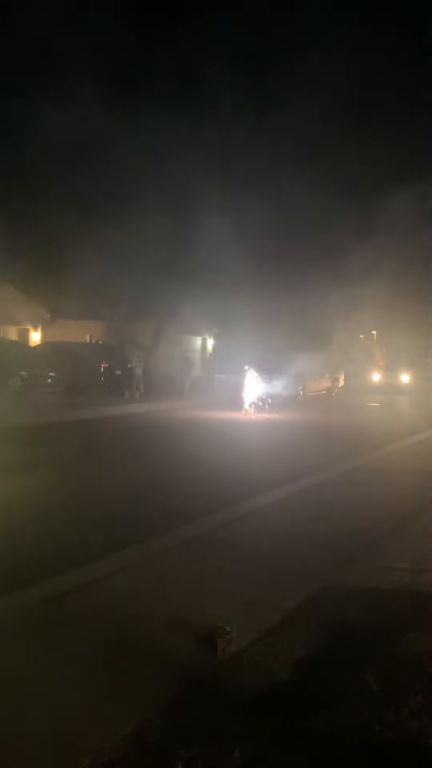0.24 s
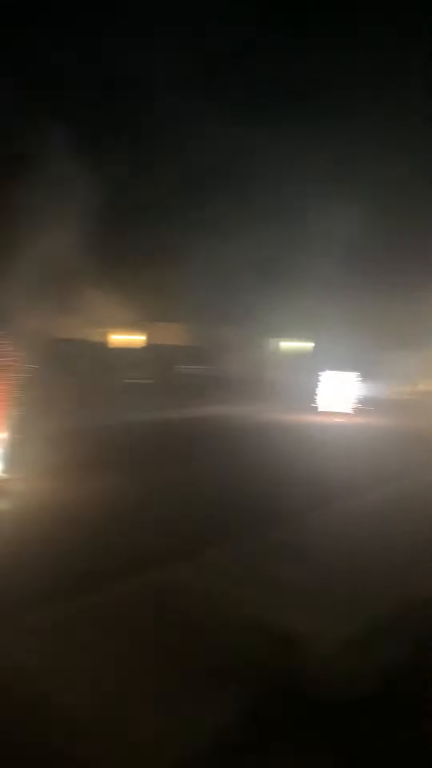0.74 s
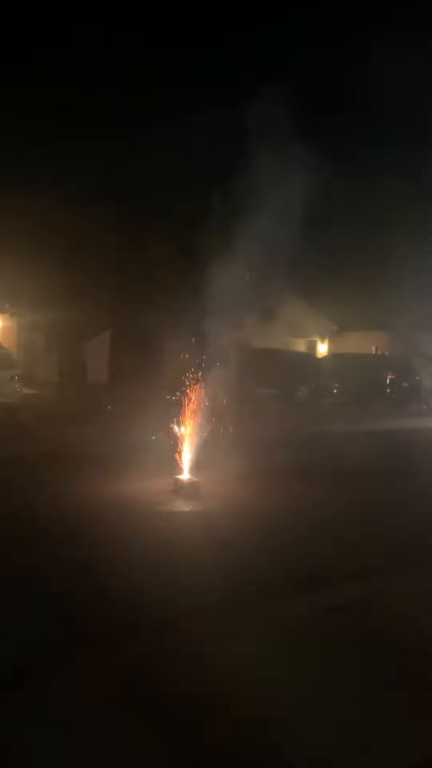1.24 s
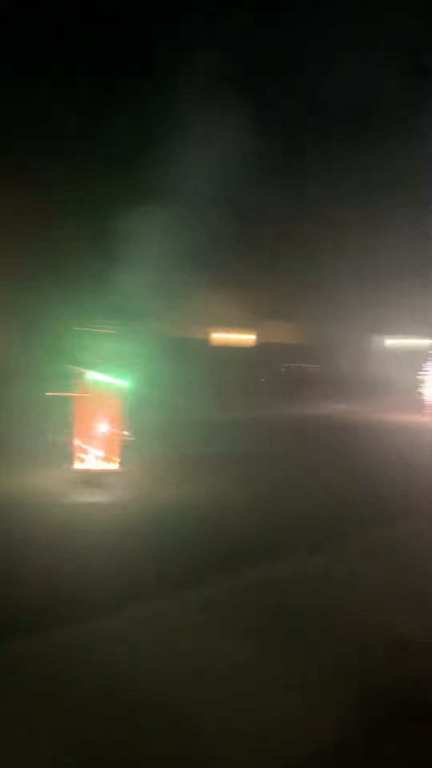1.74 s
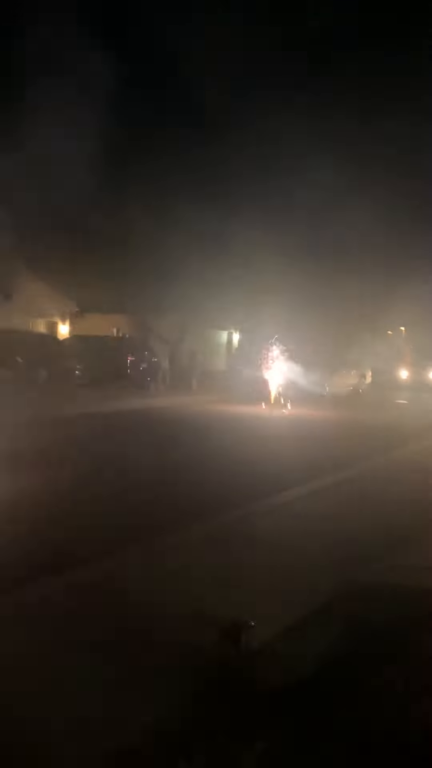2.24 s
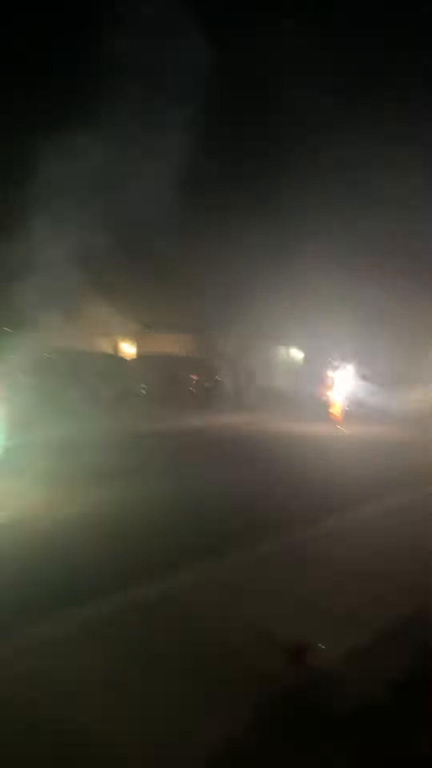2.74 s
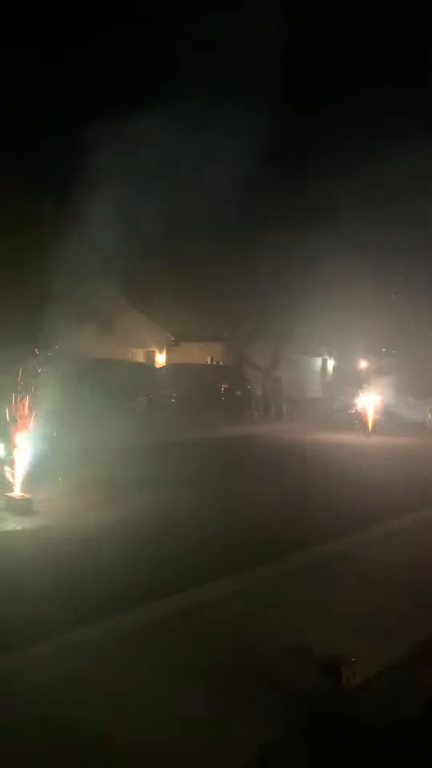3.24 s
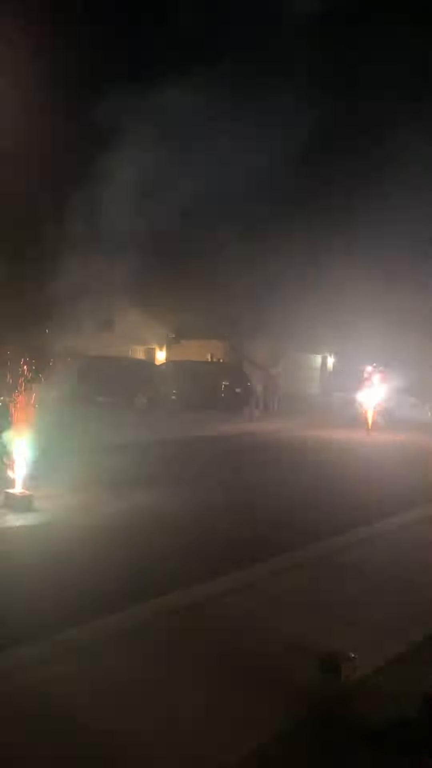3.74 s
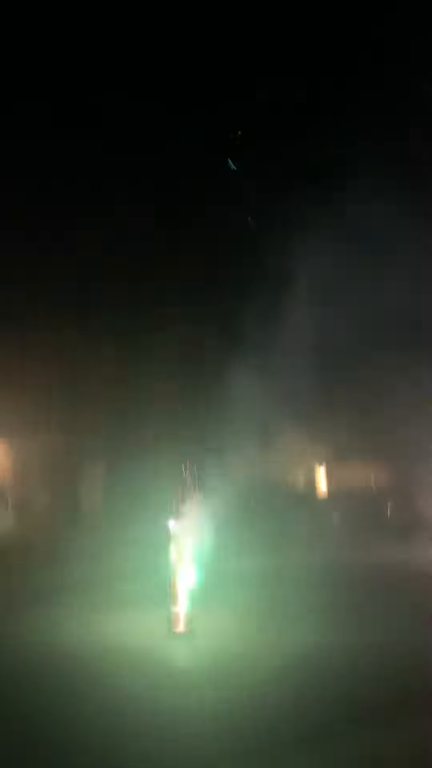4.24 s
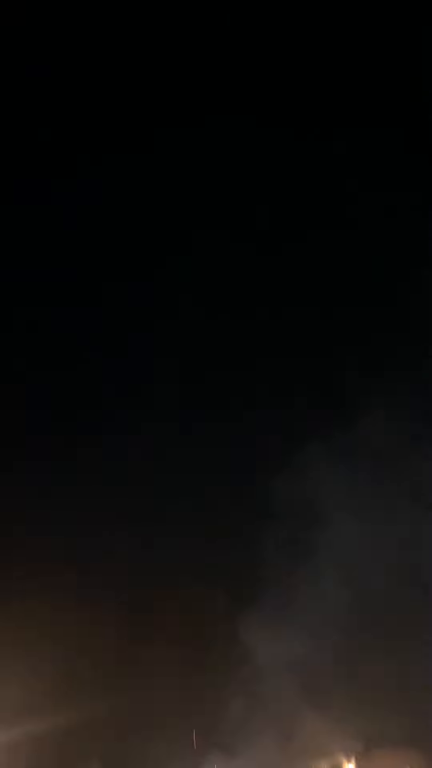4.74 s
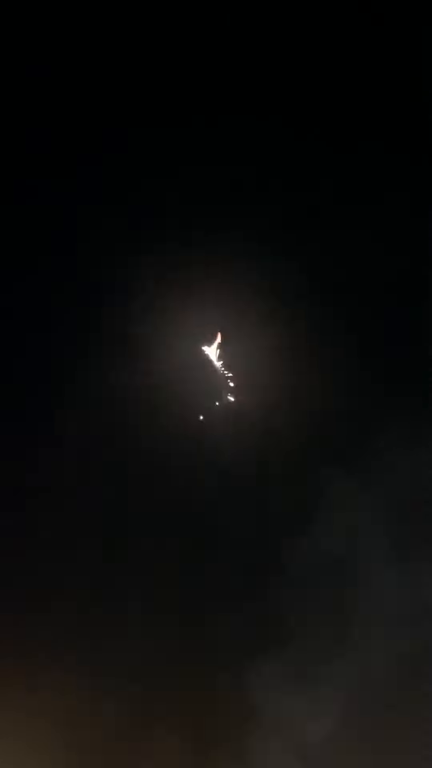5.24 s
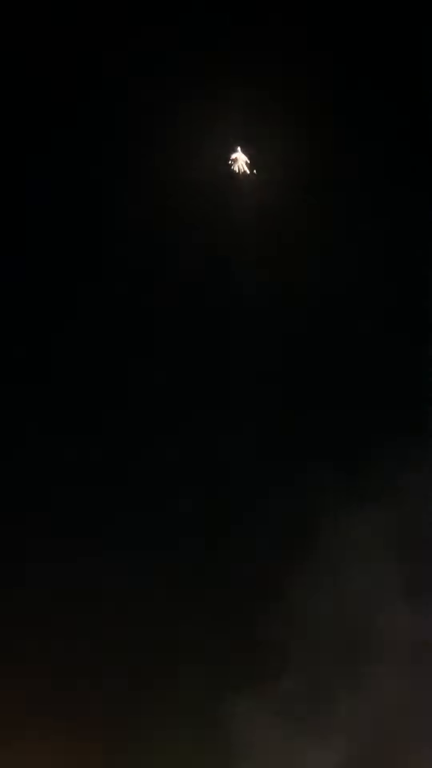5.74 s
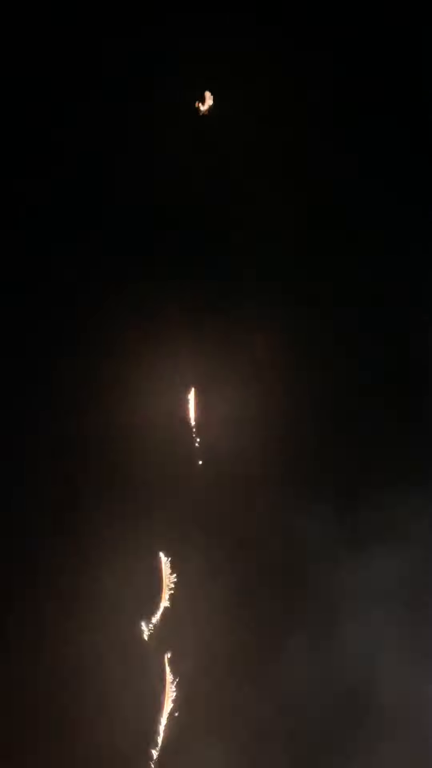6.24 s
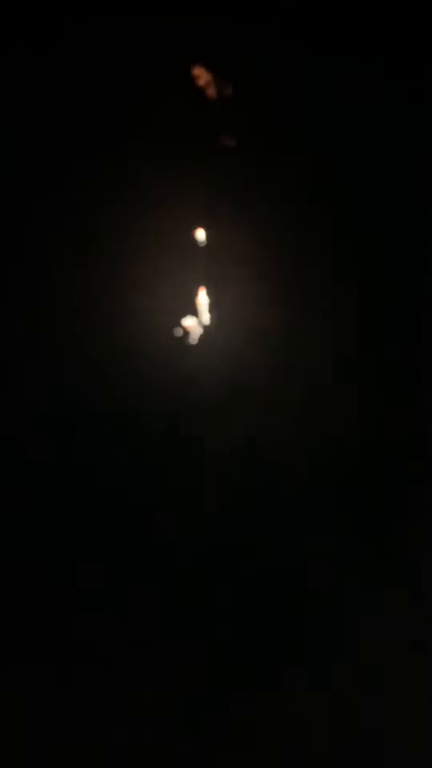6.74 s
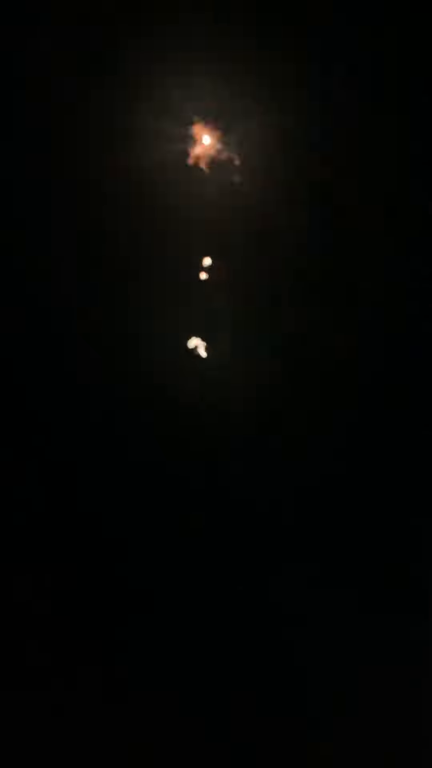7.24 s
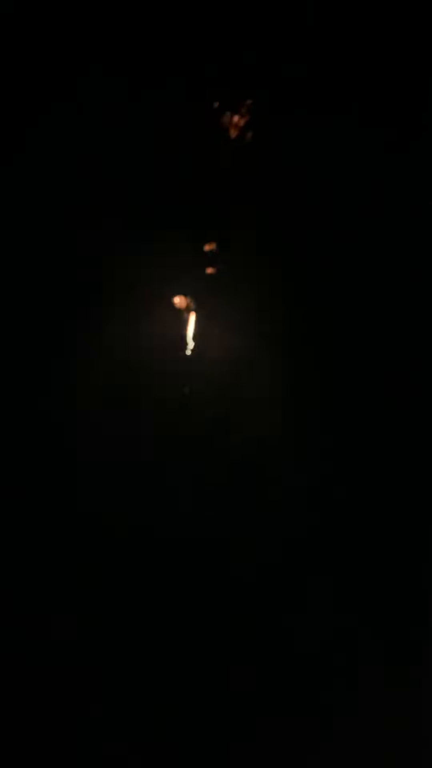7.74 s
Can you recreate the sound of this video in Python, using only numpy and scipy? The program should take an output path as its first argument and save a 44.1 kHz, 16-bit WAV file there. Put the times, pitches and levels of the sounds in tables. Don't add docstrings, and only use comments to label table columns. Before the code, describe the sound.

A firework fountain catches, bursts into dense sharp crackling on a night street, then sputters while tubes thump out shrill whistling stars that sink in pitch.

```python
import sys
import numpy as np
from scipy import signal
from scipy.fft import rfft, irfft, next_fast_len
from scipy.io import wavfile
from scipy.ndimage import uniform_filter1d, minimum_filter1d

SR = 44100
rng = np.random.default_rng(int(sys.argv[2]) if len(sys.argv) > 2 else 0)


def transcribe(signal):
    frames = np.atleast_2d(signal).T
    limited = np.clip(frames, -1, 1)
    pcm = np.round(limited * 32767).astype(np.int16)
    wavfile.write(sys.argv[1], SR, pcm)


def magnitude_from_level(level_db):
    exponent = np.asarray(level_db, float) / 20
    return 10 ** exponent


N = 352359

# (time [s], jet hiss [dB], crackle [dB])
BURN = [(0, -55.5, -48), (1.2, -54, -39), (1.68, -44.5, -62), (1.8, -27, -9.5), (2.679, -29.5, -9),
        (2.75, -36, -8), (3.5, -33.5, -9.5), (3.7, -49, -17.5), (4.1, -39.5, -18), (5.8, -39, -14),
        (6.3, -41.5, -25), (6.55, -50.5, -66), (7.99, -53.5, -97)]
# (time [s], peak [dB])
LOUD_SPARKS = [(1.248, -10), (1.3047, -23), (1.3393, -14.5), (1.35, -7), (1.3771, -9.5), (1.405, -22),
               (1.4315, -23.5), (1.458, -23.5), (1.4944, -23), (1.5189, -8), (1.5745, -23.5), (1.6096, -3.5),
               (1.6654, -19.5), (1.7015, -14), (1.706, -7.5), (1.7277, -7), (1.7323, -4.5), (1.741, -11),
               (1.7633, -5.5), (1.7872, -4), (1.8152, -9), (1.8348, -4.5), (1.8526, -3), (1.8714, -7),
               (1.8916, -2.5), (1.9106, -7.5), (1.9193, -0.5), (1.9345, -4), (1.9433, -5.5),
               (1.9782, -4), (1.9957, -0.5), (2.021, -1), (2.0434, -2), (2.0756, -2), (2.0935, -7.5),
           (2.109, -3.5), (2.1361, -3.5), (2.17, -7.5), (2.1858, -4), (2.2002, -3.5), (2.2701, -2.5),
           (2.2861, -0.5), (2.3029, -6), (2.3272, -0.5), (2.3584, -4.5), (2.3921, -7.5), (2.4365, -7),
           (2.4525, -3.5), (2.4974, -1), (2.5083, -5), (2.5289, -5), (2.5585, -6), (2.5766, -3.5),
           (2.5952, -5), (2.6247, -2), (2.6546, -1), (2.668, -4), (2.6708, -7), (2.6751, -3.5),
               (2.7412, -11.5), (2.782, -10), (2.8244, -11), (2.864, -8), (2.904, -6), (2.9395, -7),
           (2.9429, -3.5), (2.979, -14.5), (2.9902, -4.5), (3.0272, -3), (3.0477, -6), (3.066, -4),
           (3.092, -9.5), (3.1463, -8.5), (3.1712, -3.5), (3.245, -3), (3.2624, -6), (3.303, -23.5),
           (3.3429, -7.5), (3.4001, -9), (3.4225, -5.5), (3.4502, -5), (3.5226, -7.5), (3.5426, -3),
           (3.6062, -12.5), (3.6527, -18), (3.9644, -17.5), (4.0066, -17), (4.0547, -15.5), (4.0952, -19.5),
               (4.1785, -8.5), (4.248, -8), (4.3195, -10.5), (4.3556, -5.5), (4.4066, -10), (4.5042, -7),
              (4.5694, -10.5), (4.6842, -13.5), (4.735, -17.5), (4.7981, -8.5), (4.8275, -7), (4.846, -5.5),
              (4.8778, -4.5), (4.9509, -8), (5.2694, -9.5), (5.3074, -11), (5.4072, -7), (5.4615, -10.5),
              (5.5814, -11), (5.647, -18.5), (5.717, -10.5), (5.786, -11), (5.846, -5), (6.0117, -9.5),
              (6.0655, -10), (6.455, -20.5), (7.126, -13), (7.2637, -22), (7.3603, -23.5), (7.6541, -16)]
HUSH_S = .014, 0.0033
# (frequency [Hz], level [dB])
SPARK = [(300, -41.5), (1000, -43), (2500, -1), (5000, 2.5), (7500, 0), (11000, -4), (16000, -13)]
# (frequency [Hz], level [dB], t60 [s])
CASING = [(311, -29.5, 0.055), (865, -13, 0.0026), (1607, -15, 0.0093), (2290, -10.5, 0.0018)]
# (frequency [Hz], level [dB])
CRACKLE_COLOUR = [(60, -18.5), (220, -9), (400, -6), (600, -10), (800, 0.5)]
# (frequency [Hz], change [dB])
TIPPED = [(500, -1), (1000, 3.5), (1700, -5), (2600, -7.5), (5000, -2)]
TIP_S = 3.7, 4.78

# (launch [s], first [Hz], last [Hz], sink [s])
STARS = [(3.555, 4872, 3019, .53), (4.893, 5133, 3202, .623), (5.862, 4952, 2808, .736),
         (6.02, 4960, 3236, .636), (6.075, 5510, 2896, .595), (7.137, 4855, 3276, .379)]
# (launch [dB], fade [dB/s], ground-image dip age [s], dip [dB], dip width [s])
FADES = [(-18, -11.5, .68, -10.5, 0.17), (-19.5, -12.5, 0.94, -2.5, 0.17), (-17.5, -23, .6, -5, 0.074),
         (-21.5, -9, 0.677, -7, 0.23), (-24, -11, 0.94, 0.5, 0.084), (-20.5, -13.5, .4, -7, 0.028)]
# (yelp [share of pitch], wane age [s], wane [dB])
HOOKS = [(0.0287, 1.1, -5.5), (.06, 1.3, -4), (0.009, 1.3, 1), (.005, 1.13, -11), (0.029, 0.965, -11.5),
         (0.0045, 0.69, -11.5)]
# (burn [s], turn age [s], rise [Hz])
ENDS = [(1.73, 1.47, 150), (1.57, 1.5, 230), (1.63, 1.56, 130), (1.63, 1.55, 230), (1.45, 1.36, 90),
        (1.6, 1.5, 100)]
# (2nd, 3rd, 4th partial at launch [dB], spin [1/s], spin depth [0-1])
VOICES = [(-13, -15.5, -24, 9.5, 0.54), (-12.5, -9.5, -16, 17, 0.4), (-12, -16.5, -24, 13, 0.64),
          (-13, -14.5, -28, 8.9, 0.07), (-15, -14, -22, 14, 0.68), (-15.5, -21, -35, 13, 0.1)]
OVERTONES_DB_PER_S = [2, -5, 2]

# (time [s], peak [dB], ring [Hz], crack
# [dB], boom [dB])
SHOTS = [(0.287, -37, 207, -17, 1), (0.356, -32.5, 368, -23, -1), (2.133, -11.5, 298, -4, -4),
         (3.543, -14, 255, 18, -16), (4.877, -13.5, 313, -21, -14), (5.845, -11, 310, -7, -14),
         (6.009, -13, 335, -9, -11), (6.066, -18, 340, -19, -15), (7.124, -15.5, 364, -27, -16.5),
         (7.195, -28.5, 300, -28, -20), (7.654, -31.5, 343.6, -29.5, -8)]

# (frequency [Hz], level [dB])
JET = [(200, 7.5), (430, 3.5), (600, 0), (1550, 5), (2100, 7.5), (3100, 3), (3800, 7), (4500, 15.5),
       (5500, 2), (7000, 5.5), (9000, -9), (15000, -5)]
# (frequency [Hz], level [dB])
RUMBLE = [(40, -1), (90, -0.5), (300, -1.5), (600, -11), (900, -9.5), (2200, -22), (3000, -10),
          (9000, -25.5)]
RUMBLE_S = 2.8, 3.8, 6.3, 6.6
RUMBLE_DB = -48.5, -57.5, -55.5, -50
# (frequency [Hz], change [dB])
SKYWARD = [(60, -6), (150, -9), (900, -9), (1500, 1.5), (3000, 1), (7000, 0), (10000, -5.5)]
# (start [s], end [s], pitch [Hz], level [dB])
DRONE = [(5.303, 5.814, 69.4, -53), (5.954, 6.41, 71, -52), (6.6, 7.112, 70.7, -58),
         (7.396, 8.209, 61.6, -62)]

# (frequency [Hz], t60 [s])
STREET = [(100, 0.057), (400, 0.57), (1500, 0.15), (4000, 0.27), (9000, 0.033), (16000, 0.36)]
# (delay [ms], level [dB])
WALLS = [(12, -19), (21, -12), (38, -68), (57, -17.5), (70, -14), (95, -18), (135, -20.5)]

# (frequency [Hz], likeness [0-1])
SAME = [(400, .99), (700, .6), (950, .9), (1400, .7), (2800, .3), (3500, .8), (4000, .82), (4500, .96),
        (9000, .94)]
# (frequency [Hz], lead [rad])
TURN = [(40, 0), (170, .3), (350, 1), (600, 1.9), (750, 1.2), (1050, 1.7), (1500, .2), (2600, .3),
        (3300, -.6), (3700, -1.8)]
# (frequency [Hz], difference [dB])
LEAN = [(50, 2.2), (200, 4.5), (400, 1), (700, -2), (1500, -2), (3000, -1.5), (4000, -1)]


def sparks(per_s=105, clumpy=0.56, spread_db=-6, bounce_ms=0.78, scatter_ms=.22, skew_ms=.25,
           fizz_s=0.024, fizz_db=-25, bounce_gain=.85):
    small = rng.random((1600, 3))
    at = (small[:, 0] * N).astype(int)
    loud_s, loud_db = np.transpose(LOUD_SPARKS)
    clump = np.clip(1 + clumpy * wander(N, 14), 0, 2.5)[at]
    ahead_s = loud_s - at[:, None] / SR
    hushed = ((ahead_s < HUSH_S[0]) & (ahead_s > -HUSH_S[1])).any(axis=1)
    lit = (small[:, 2] < clump * per_s * N / SR / len(small)) & ~hushed
    spread = magnitude_from_level(spread_db * np.minimum(-np.log(small[:, 1] + 1e-9), 4))
    size = np.r_[magnitude_from_level(loud_db), lit * burn(2)[at] * spread]
    at = np.r_[np.round(loud_s * SR), at]

    height, side = rng.standard_normal((len(at), 2)).T
    echo = abs(bounce_ms + scatter_ms * height) * SR / 1000
    train = np.zeros((2, N))
    for port, shift in enumerate((0, skew_ms * SR / 1000 * side)):
        direct = np.clip(at + shift, 0, N - 1).astype(int)
        bounced = np.clip(at + shift + echo, 0, N - 1).astype(int)
        np.add.at(train[port], direct, size)
        np.add.at(train[port], bounced, bounce_gain * size)

    glow = signal.lfilter([1], [1, -np.exp(-np.log(1000) / (fizz_s * SR))], train, axis=1)
    drive = train + magnitude_from_level(fizz_db) * glow * rng.standard_normal((2, N))
    t = np.arange(1024) / SR
    shock = causal(SPARK)
    shock = shock / abs(shock).max()
    for hz, db, t60 in CASING:
        shock = shock + magnitude_from_level(db - 60 * t / t60) * np.sin(2 * np.pi * hz * t)
    return -1.2 * signal.oaconvolve(drive, shock[None], axes=1)[:, :N]


def star(row, fade, hook, end, voice, wobble=0.0181, settle_s=0.28, steady_sway=0.00098, jitter=0.0098,
         flutter_db=3, twin=0.038, twin_db=-6, roar_db=-42, drift_rad=2.37, spent_s=.04):
    *overs_db, spin_hz, depth = voice
    launch_s, burn_s = row[0], end[0]
    t = np.arange(launch_s, min(launch_s + burn_s, N / SR), 1 / SR)
    age = t - launch_s
    hz, db = flight(age, *row[1:], fade, hook, end)
    fresh = np.exp(-age / settle_s)
    spin = 2 * np.pi * (spin_hz * age + rng.random())
    sway = steady_sway + wobble * (0.25 + depth) * fresh
    sway = sway * (np.sin(spin) + 0.562 * wander(len(t), 25.8))
    pitch = hz * (1 + sway + jitter * fresh * wander(len(t), 150))
    facing = 1 - np.clip(depth, 0, .98) * (.5 + .5 * np.cos(spin))
    ports = np.array([0 * t, drift_rad * wander(len(t), 5.17)])

    tone = magnitude_from_level(roar_db) * rng.standard_normal((2, len(t)))
    for shift, gain in ((1, 1), (1 + twin * fresh, magnitude_from_level(twin_db) * fresh)):
        turn = 2 * np.pi * np.cumsum(pitch * shift) / SR + ports
        tone += gain * np.cos(turn)
        for k, over_db, db_per_s in zip(range(2, 5), overs_db, OVERTONES_DB_PER_S):
            level = magnitude_from_level(over_db + db_per_s * age) * facing ** (k - 1) * (k * pitch < SR / 2.5)
            tone += gain * level * np.cos(k * turn)

    edges = np.clip(np.minimum(age / 0.002, (burn_s - age) / spent_s), 0, 1)
    flutter = magnitude_from_level(db + flutter_db * wander(len(t), 43.6))
    out = np.zeros((2, N))
    out[:, round((launch_s - .003) * SR):][:, :len(t)] = np.sqrt(2) * tone * edges * flutter
    return out


def flight(age, first_hz, last_hz, sink_s, fade, hook, end, hook_s=.035, wane_s=.03, chirp_s=.015,
           burst_db=3, burst_s=0.022):
    launch_db, fade_db, dip_age, dip_db, dip_s = fade
    yelp, wane_age, wane_db = hook
    _, turn_age, rise_hz = end
    hz = last_hz + (first_hz - last_hz) * np.exp(-age / sink_s)
    hz = hz + rise_hz / (1 + np.exp((turn_age - age) / hook_s))
    hz = hz * (1 + yelp * np.exp(-age / chirp_s))
    db = launch_db + fade_db * age
    db = db + dip_db * np.exp(-((age - dip_age) / dip_s) ** 2)
    db = db + wane_db / (1 + np.exp((wane_age - age) / wane_s))
    return hz, db + burst_db * np.exp(-age / burst_s)


def shots(peak_s=0.006, width_s=0.0018, heave_rad=1.2, fuse_s=0.00077, crack_t60=0.0069,
          knock_hz=680, knock_db=-12, knock_s=0.0038, boom_hz=100, boom_s=0.00695, boom_t60=0.067):
    t = np.arange(6000) / SR
    out = np.zeros(N + 6000)
    knock = np.sin(2 * np.pi * knock_hz * t) * np.exp(-((t - knock_s) / width_s) ** 2)
    after = np.maximum(t - boom_s, 0)
    for s, db, hz, crack_db, boom_db in SHOTS:
        heave = np.cos(2 * np.pi * hz * (t - peak_s) + heave_rad)
        heave = heave * np.exp(-((t - peak_s) / width_s) ** 2)
        boom = magnitude_from_level(boom_db - 60 * after / boom_t60) * np.sin(2 * np.pi * boom_hz * after)
        crack = magnitude_from_level(min(crack_db, -3) - 60 * (t - fuse_s) / crack_t60) * (t > fuse_s)
        crack = crack * rng.standard_normal(len(t))
        thump = 1.2 * heave + magnitude_from_level(knock_db) * knock + boom + crack
        out[round(s * SR):][:len(t)] += magnitude_from_level(db) * thump
    return out[:N]


def hiss_and_rumble():
    t = np.arange(N) / SR
    hiss = burn(1) * noise(JET, patchy_db=4.7)
    rumble = magnitude_from_level(np.interp(t, RUMBLE_S, RUMBLE_DB)) * noise(RUMBLE, patchy_db=2.5)
    return crossfaded(hiss + rumble, SKYWARD, RUMBLE_S[2:])


def drone():
    t = np.arange(N) / SR
    out = np.zeros(N)
    for start, end, hz, db in DRONE:
        swell = np.sin(np.pi * np.clip((t - start) / (end - start), 0, 1))
        out += np.sqrt(2) * magnitude_from_level(db) * swell * np.sin(2 * np.pi * hz * t)
    return out


def street(x, wet_db, walls_db):
    taps = np.zeros((2, SR // 2))
    at = np.arange(480, SR // 2 - 20, 20)
    at = at + rng.integers(0, 20, (2, len(at)))
    np.put_along_axis(taps, at, rng.choice([-1., 1.], at.shape), 1)
    hz, t, z = signal.stft(taps, SR, nperseg=256)
    tail = signal.istft(z * magnitude_from_level(-60 * t / read(STREET, hz)[:, None]), SR, nperseg=256)[1]
    tail *= magnitude_from_level(wet_db) / np.linalg.norm(tail[0])
    for ms, db in WALLS:
        tail[:, round(ms * SR / 1000)] += magnitude_from_level(db + walls_db)
    return x + signal.fftconvolve(x * np.ones((2, 1)), tail, axes=1)[:, :N]


def burn(column):
    rows = np.transpose(BURN)
    return magnitude_from_level(np.interp(np.arange(N) / SR, rows[0], rows[column]))


def noise(points, patchy_db):
    hz = np.fft.rfftfreq(1024, 1 / SR)
    a, b, patches = rng.standard_normal((N // 256 + 5, 513, 2, 3)).T
    patches = uniform_filter1d(patches[0], size=12, axis=0)
    patches = evened(uniform_filter1d(patches, size=12, axis=1))
    z = (a + 1j * b) * magnitude_from_level(read(points, hz)[:, None] + patchy_db * patches)
    return evened(signal.istft(z, nperseg=1024, noverlap=768)[1][:, :N])


def wander(size, hz):
    return evened(signal.lfilter(*signal.butter(2, hz, fs=SR), rng.standard_normal(size)))


def evened(x):
    return x / np.sqrt(np.mean(x ** 2) + 1e-20)


def read(points, hz):
    f, value = np.transpose(points)
    return np.interp(np.log(hz + 1), np.log(f + 1), value)


def causal(points):
    log_gain = np.log(magnitude_from_level(read(points, abs(np.fft.fftfreq(2048, 1 / SR)))))
    return np.fft.ifft(np.exp(np.conj(signal.hilbert(log_gain)))).real[:1024]


def filtered(x, points):
    return signal.oaconvolve(x, causal(points)[None], axes=1)[:, :N]


def crossfaded(x, points, span_s):
    turned = np.interp(np.arange(N) / SR, span_s, (0, 1))
    return (1 - turned) * x + turned * filtered(x, points)


def scene():
    crackle = filtered(street(sparks(), wet_db=-9.5, walls_db=-5), CRACKLE_COLOUR)
    crackle = crossfaded(crackle, TIPPED, TIP_S)
    whistles = sum(star(*rows) for rows in zip(STARS, FADES, HOOKS, ENDS, VOICES))
    whistles = street(whistles, wet_db=-15, walls_db=-2.5)
    thumps = street(shots(), wet_db=-10.5, walls_db=-5)
    return crackle + whistles + thumps + hiss_and_rumble() + drone()


def thinned(pair, under_db=-8, masked_db=-30, loud_db=-66, size=16):
    mid_side = np.array([pair[0] + pair[1], pair[0] - pair[1]]) / 2
    hz, _, z = signal.stft(mid_side, SR, nperseg=1024)
    bands = (abs(z[:, :512]) ** 2).reshape(2, -1, size // 2, z.shape[2]).mean(axis=2)
    both = bands.sum(axis=0)
    near = -minimum_filter1d(-both, size=6, axis=0, origin=1)
    heard = bands > np.minimum(magnitude_from_level(2 * under_db) * bands[::-1], magnitude_from_level(2 * loud_db))
    keep = heard & (both > magnitude_from_level(2 * masked_db) * near)
    z[:, :512] *= np.repeat(keep, size // 2, axis=1) | (hz[:512, None] < 2000)
    mid, side = signal.istft(z, SR, nperseg=1024)[1][:, :N]
    return np.array([mid + side, mid - side])


def low_pass(x):
    return signal.sosfilt(signal.butter(12, 16990, fs=SR, output="sos"), x)


def record(dry, late_s=.000231, flip_rad=3.62, split_hz=3700, low_hz=50, edge_hz=15850):
    size = next_fast_len(N + 4096)
    hz = np.fft.rfftfreq(size, 1 / SR)
    a, b = rfft(dry, size)
    same = read(SAME, hz)
    other = np.sqrt(1 - same ** 2)
    turn = np.where(hz < split_hz, read(TURN, hz), flip_rad - 2 * np.pi * late_s * hz)
    right = (same * a + other * b) / np.sqrt(1 + same * other) * np.exp(1j * turn)
    lean = magnitude_from_level(read(LEAN, hz) / 2)
    edges = 1 / (1 + (hz / edge_hz) ** 300) / (1 + (low_hz / (hz + 1)) ** 4)
    pair = irfft(np.array([a * lean, right / lean]) * edges, size)[:, :N]
    mix = np.clip(thinned(pair), -.94, .94)
    return low_pass(mix)


dry = scene()
out = record(dry)
transcribe(out)
```